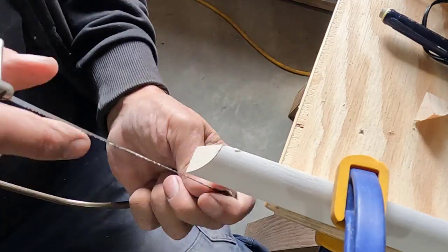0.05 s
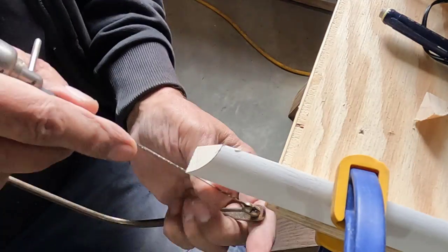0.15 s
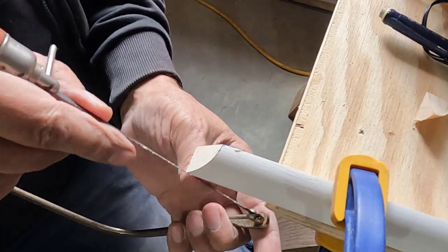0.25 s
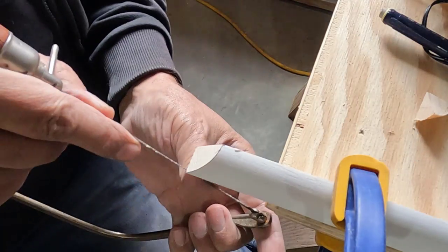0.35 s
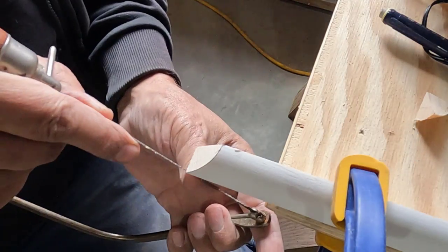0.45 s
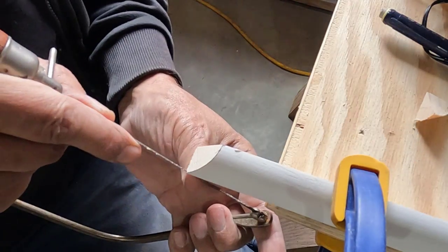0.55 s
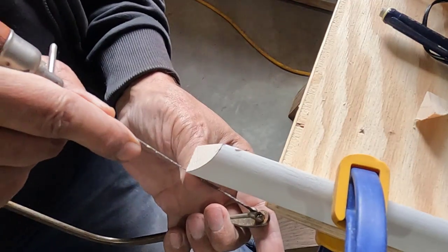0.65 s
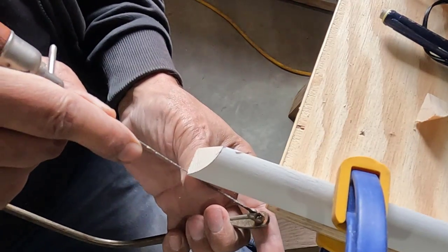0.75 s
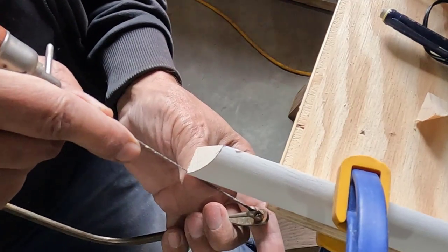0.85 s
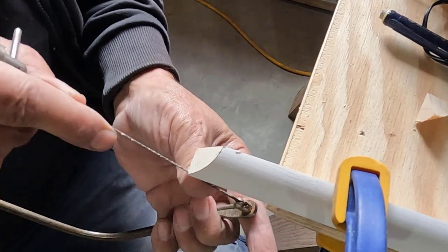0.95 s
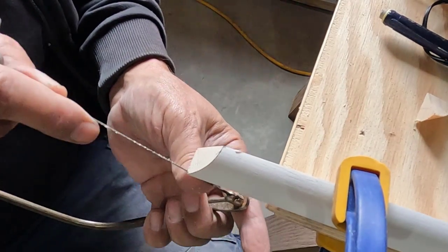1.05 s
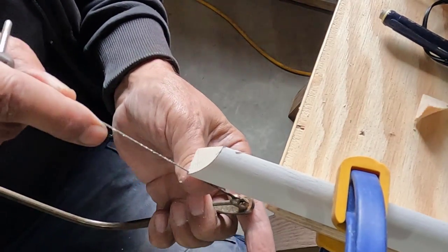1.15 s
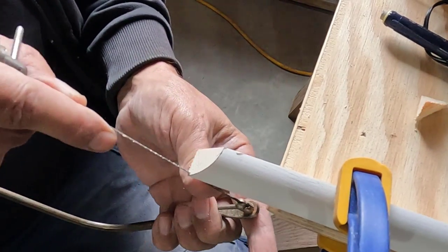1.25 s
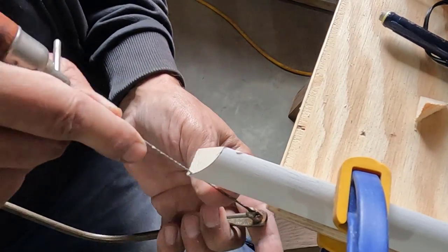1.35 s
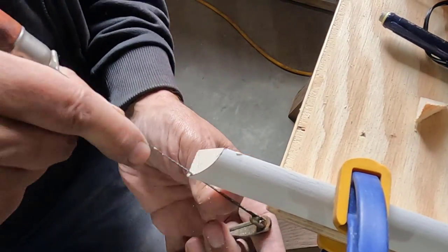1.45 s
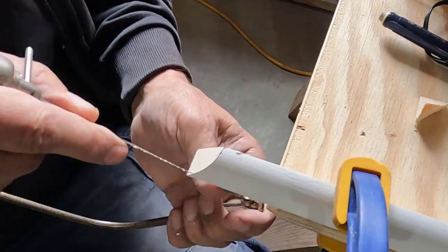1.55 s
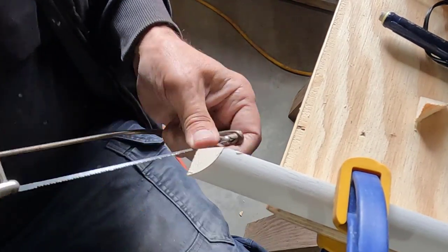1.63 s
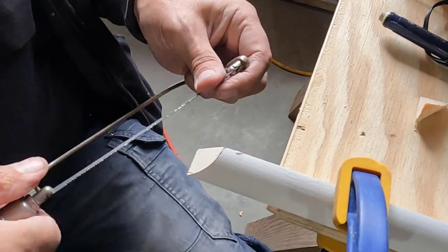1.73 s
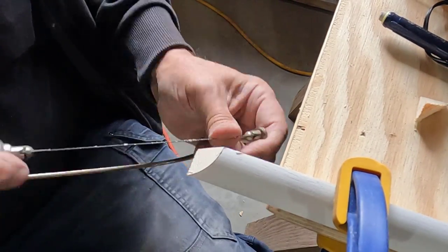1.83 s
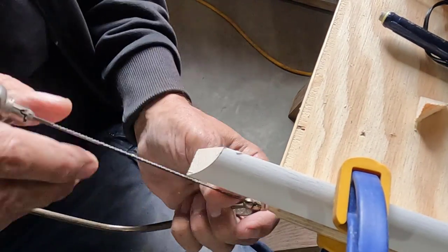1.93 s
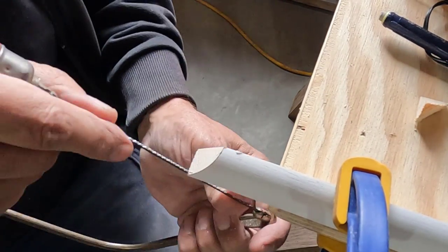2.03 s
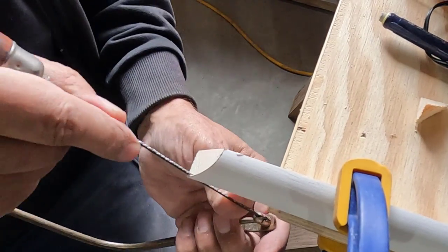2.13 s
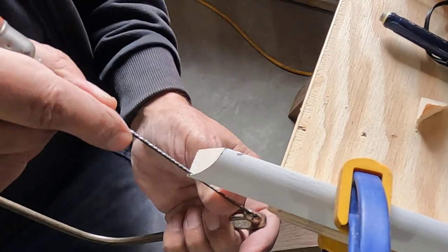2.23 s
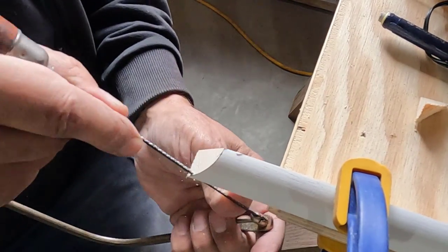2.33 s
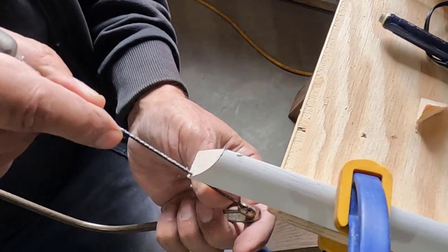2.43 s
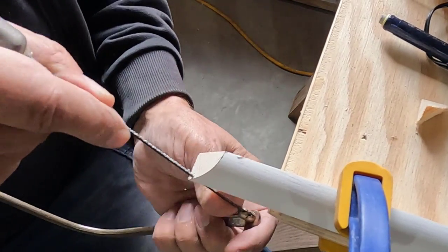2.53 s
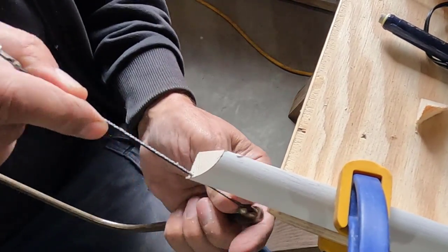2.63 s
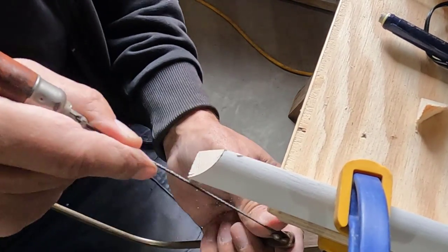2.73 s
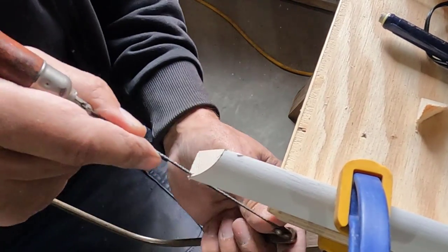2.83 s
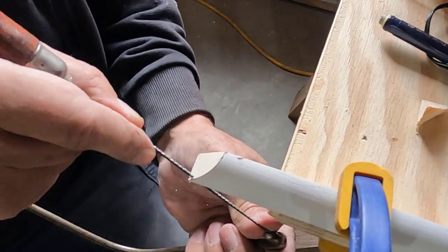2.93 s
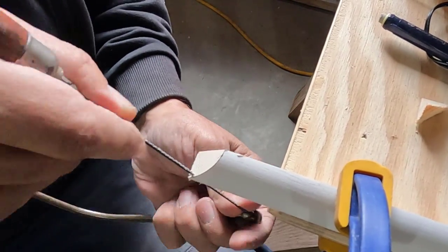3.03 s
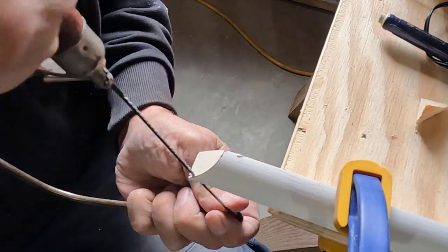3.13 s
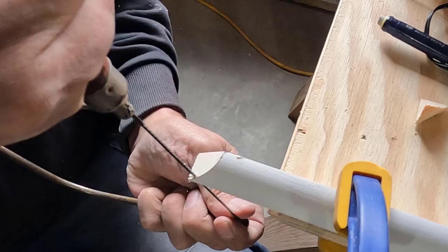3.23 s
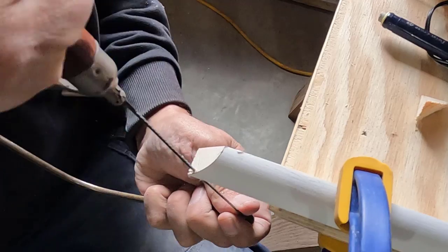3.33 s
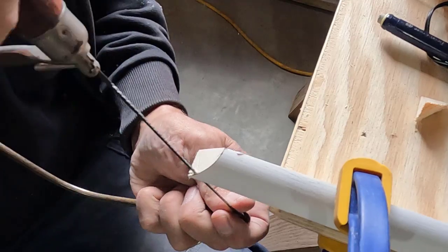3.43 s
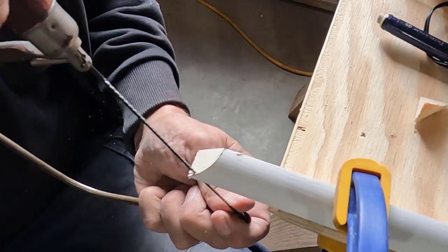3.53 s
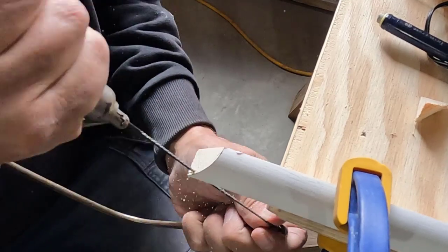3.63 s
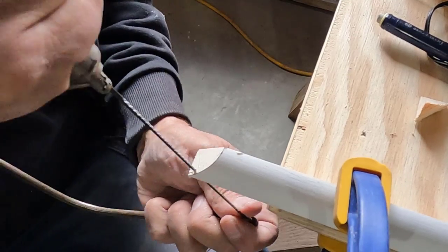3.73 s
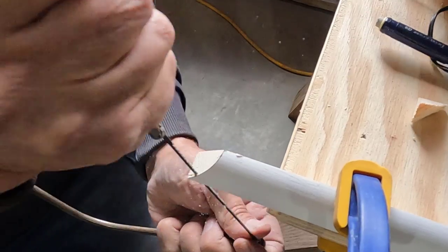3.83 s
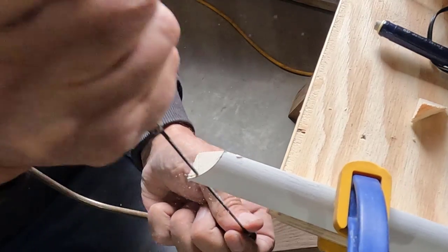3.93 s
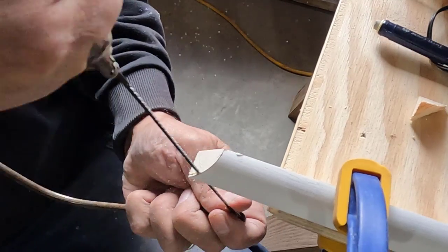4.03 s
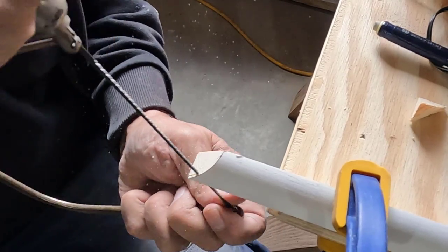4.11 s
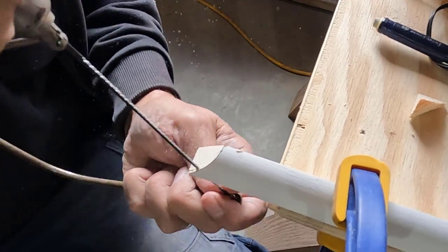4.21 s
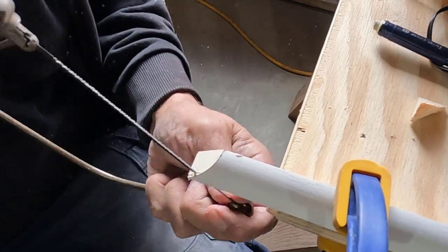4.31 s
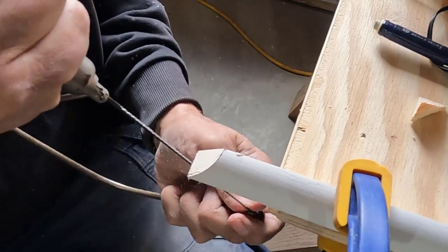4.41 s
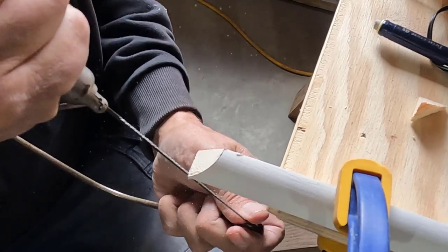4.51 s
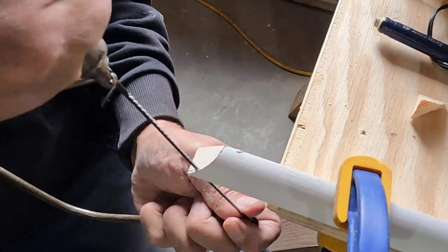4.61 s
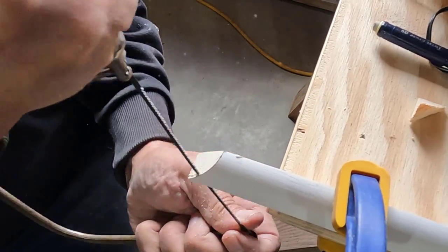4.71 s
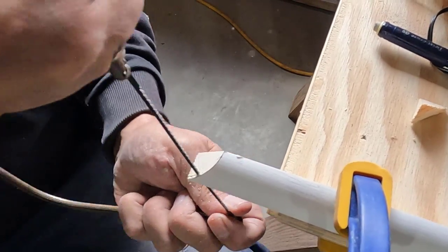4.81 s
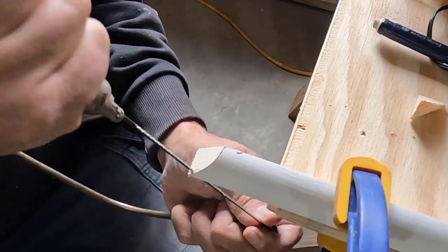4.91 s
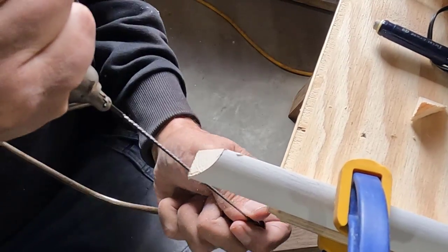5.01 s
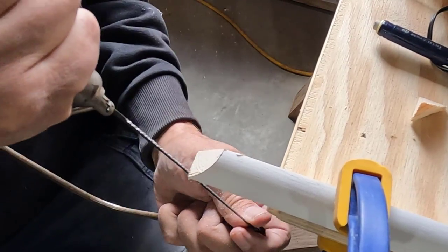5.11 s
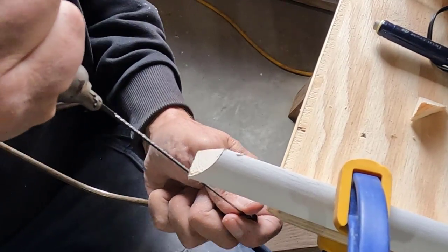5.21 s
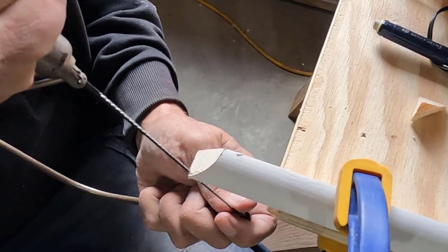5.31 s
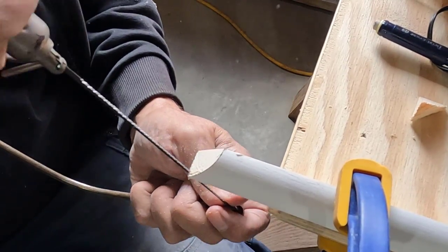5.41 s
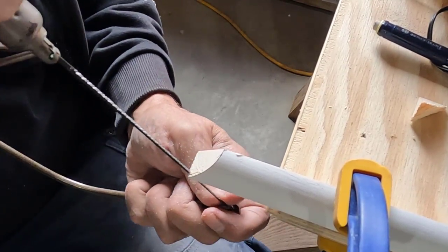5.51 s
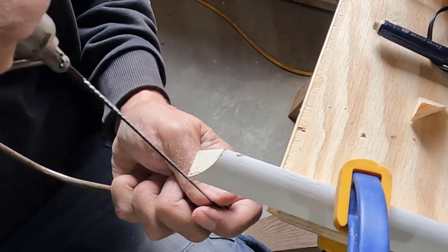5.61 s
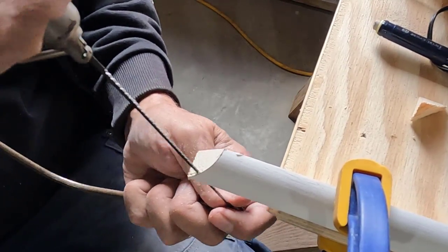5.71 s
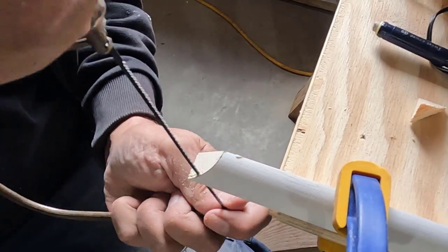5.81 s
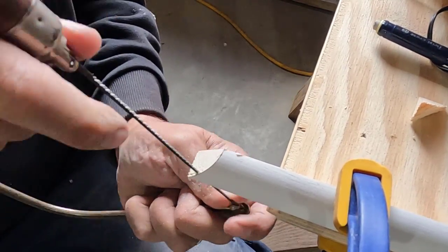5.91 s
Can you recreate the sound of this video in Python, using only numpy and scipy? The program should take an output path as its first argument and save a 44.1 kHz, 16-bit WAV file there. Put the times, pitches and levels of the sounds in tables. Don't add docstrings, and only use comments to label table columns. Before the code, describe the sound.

Soft sleeve and hand movement opens, then jerky saw bites scrape and thud in wood. A lull with faint squeak and brushing follows, then more bites, growing heaviest around the middle and later part with clunky jolts and bright snaps. Light scrapes and rustle end it. Close microphone, small dry workshop, very slight reverberation.

```python
import sys
import numpy as np
from scipy import signal
from scipy.fft import rfft, irfft, next_fast_len
from scipy.io import wavfile
from scipy.ndimage import uniform_filter1d, map_coordinates

SR = 44100
rng = np.random.default_rng(int(sys.argv[2]) if len(sys.argv) > 2 else 0)


def output_pcm(signal):
    pcm = np.clip(np.atleast_2d(signal).T, -1, 1) * 32767
    wavfile.write(sys.argv[1], SR, np.round(pcm).astype(np.int16))


def elevation(decibels):
    levels = np.asarray(decibels, float)
    return 10 ** (levels / 20)


N = 262836
LEAD_S = .07
PUSH = 8192
PUSH_HZ = np.fft.rfftfreq(PUSH, 1 / SR)


def unit(x):
    return x / np.sqrt(np.mean(np.abs(x) ** 2) + 1e-20)


def along(points, hz):
    f, value = np.transpose(points)
    return np.interp(np.log(hz + 1), np.log(f + 1), value)


def wobble(rate):
    knots = rng.standard_normal(int(N * rate / SR) + 4)
    return map_coordinates(knots, [np.arange(N) * rate / SR])


def filtered(x, response):
    m = next_fast_len(x.shape[-1] + SR // 2)
    y = irfft(rfft(x, m) * response(np.fft.rfftfreq(m, 1 / SR)), m)
    return y[..., :x.shape[-1]]


def patchy(spectrum, patchy_db):
    z = signal.stft(rng.standard_normal(N), nperseg=512)[2]
    field = uniform_filter1d(rng.standard_normal(z.shape), 6, 0)
    field = uniform_filter1d(field, 6, 1)
    noise = signal.istft(z * elevation(patchy_db * unit(field)), nperseg=512)[1][:N]
    return unit(filtered(noise, lambda hz: elevation(along(spectrum, hz))))


# pitch_hz, level_db (per Hz)
RUB = [(18, -33), (35, 5.5), (119, -8), (165, -0.5), (284, -5), (362, -2.5), (448, -5), (900, -17),
       (1170, -70), (1980, -120)]
CLOTH = [(350, -5.5), (600, 0.5), (1090, 1.5), (1300, 3), (2190, -2.5), (4000, -9.5), (5500, -20),
         (8800, -49)]
HISS = [(1760, -12.5), (3000, -8.5), (3150, -12.5), (5290, -13), (7500, -21), (9750, -61), (16500, -120)]
FIZZ = [(4000, -20), (6500, -11.5), (8000, -8), (8800, 4), (10000, 3), (11300, 9.5), (12600, -20),
        (13300, -8)]
# time_s, level_db
MOVEMENT = [(0.0, -54.5), (0.16, -61.5), (0.45, -61.5), (1.03, -58.5), (1.18, -58), (1.78, -61.5),
            (2.09, -59), (2.51, -56.5), (2.82, -60.5), (3.3, -58), (3.49, -55.5), (3.9, -54.5),
            (4.23, -51.5), (4.4, -55), (5.16, -57), (5.43, -53.5), (5.66, -60), (5.96, -56.5)]
# start_s, length_s, hiss_level_db
SWISHES = [(-.05, 0.24, -64), (0.683, 0.098, -69), (1.0, 0.11, -71), (1.328, 0.056, -65),
           (1.593, 0.16, -59.5), (1.77, .08, -58.5), (1.903, 0.17, -65.5), (2.3, 0.36, -70),
           (2.824, 0.14, -65), (3.126, .1, -59), (3.396, .06, -77), (3.644, 0.073, -64), (4.077, 0.06, -76),
           (4.347, 0.065, -62), (4.598, .08, -66), (4.747, 0.066, -58), (5.17, 0.14, -63),
           (5.582, .13, -65), (5.918, 0.12, -58)]


def rustle():
    calm_db, edge_s, fade_s = -58, 0.018, 0.064
    t = np.arange(N) / SR
    cloth_db = np.interp(t, *np.transpose(MOVEMENT))
    busy_db = cloth_db - calm_db
    swish = np.zeros(N)
    for s, length, db in SWISHES:
        opening = np.minimum((t - s) / edge_s, (s + length - t) / fade_s)
        swish += elevation(db) * np.clip(opening + .5, 0, 1) ** 2
    shared, treble = wobble(21.3), wobble(21.92)
    rub_gain = elevation(calm_db + 5 + busy_db + 0.41 * shared)
    cloth_gain = np.hypot(elevation(cloth_db), elevation(-1) * swish) * elevation(1.1 * shared)
    hiss_gain = np.hypot(elevation(calm_db - 13 + 0.21 * busy_db), swish) * elevation(.9 * shared + .8 * treble)
    fizz_gain = np.hypot(elevation(calm_db - 30 + 0.32 * busy_db), elevation(-8.5) * swish)
    fizz_gain = fizz_gain * elevation(.9 * shared + 2.5 * treble)
    low = rub_gain * patchy(RUB, patchy_db=-2.5) + cloth_gain * patchy(CLOTH, patchy_db=.6)
    high = hiss_gain * patchy(HISS, patchy_db=.7) + fizz_gain * patchy(FIZZ, patchy_db=.8)
    return low + high


# pitch_hz, level_db (per Hz)
HUSH = [(5000, -30), (7500, -3), (9000, 0), (12400, -2), (13000, -30)]


def hush():
    return elevation(-89) * patchy(HUSH, patchy_db=0)


def ringing(modes, hz, scatter_db):
    luck = elevation(scatter_db * rng.standard_normal(len(modes)))
    answer = 0
    for k, (centre, width, db) in enumerate(modes):
        resonance = 1j * hz * width / (centre * centre - hz * hz + 1j * hz * width)
        answer = answer + (-1) ** k * luck[k] * elevation(db) * resonance
    return unit(answer)


def diffuse(modes, hz, scatter_db):
    luck = elevation(scatter_db * rng.standard_normal(len(modes)))
    power = 0
    for k, (centre, width, db) in enumerate(modes):
        detuning = (centre * centre - hz * hz) ** 2 + (hz * width) ** 2
        power = power + (luck[k] * elevation(db) * hz * width) ** 2 / detuning
    cepstrum = irfft(np.log(power + 1e-9) / 2)
    cepstrum[1:len(hz) - 1] *= 2
    cepstrum[len(hz):] = 0
    return unit(np.exp(rfft(cepstrum)))


def teeth(rate, uneven_db, tearing):
    catches = (rng.random(PUSH) < rate / SR) * elevation(uneven_db * rng.standard_normal(PUSH))
    catches = unit(catches - catches.mean())
    share = np.clip(tearing, 0, 1)
    return np.sqrt(1 - share) * catches + np.sqrt(share) * rng.standard_normal(PUSH)


# pitch_hz, width_hz, level_db
MOULDING = [(920, 50, -9), (1050, 90, 0), (1180, 100, -3), (1330, 120, -9), (1510, 100, 0), (1690, 90, -1),
            (1885, 90, -1), (2085, 90, -2), (2250, 110, -6)]
TIP = [(2580, 230, 11.5), (2990, 82, 10), (3190, 250, -1.5), (3230, 326, 4.5), (4020, 550, -2)]
BLADE = [(4300, 113, 6), (4650, 103, 6), (5290, 68, -0.5), (5970, 340, -8), (6950, 340, -1),
         (8070, 120, -5.5), (10400, 8500, -30), (11360, 410, -10.5)]
BOARD = [(285, 50, -4), (338, 50, 1), (410, 60, -5), (478, 45, -1), (610, 45, -5), (740, 110, -13)]
BENCH = [(86, 150, -6), (162.9, 49.6, 7), (219, 290, -19.5)]


def burst(rise, fall, grain, *bodies):
    sound = 0
    for modes, db, scatter_db, focus in bodies:
        steel = modes is BLADE
        t = np.arange(PUSH) / SR - LEAD_S + steel * min(.0005, rise / 2)
        span = np.where(t < 0, rise, fall * .75 ** steel)
        reach = np.abs(t) / np.maximum(span, .002)
        pressure = elevation(focus * -10 * reach ** np.where(t < 0, 2.7, 1.4))
        work = np.sqrt(np.mean(pressure ** 2))
        answer_of = diffuse if steel or modes is TIP else ringing
        answer = answer_of(modes, PUSH_HZ, scatter_db)
        sound = sound + elevation(db) * work * unit(irfft(rfft(pressure * grain) * answer, PUSH))
    return sound


def fine_teeth(tearing=.42):
    return teeth(600, 3, tearing)


def add(out, s, sound):
    start = round((s - LEAD_S) * SR)
    out[start:start + len(sound)] += sound


# strongest_s, moulding_db, thud_above_it_db, rise_s, fall_s
BITES = [(0.768, -47, -6, 0.0098, 0.0065), (0.966, -33, 0.5, 0.0079, 0.042),
         (0.991, -29.5, -1.5, 0.0035, 0.0056), (1.068, -38.5, -4, 0.0081, 0.024),
         (1.144, -46.5, -0.5, 0.017, 0.026), (1.284, -32.5, 2.5, 0.025, 0.013),
         (1.395, -23, 0.5, 0.018, 0.02), (1.445, -43.5, -4, 0.031, 0.0065),
         (2.281, -37, -1.5, 0.02, .016), (2.335, -34, -0.5, 0.0029, 0.04),
         (2.391, -32, -4, 0.017, 0.013), (2.416, -34.5, -1.5, .015, 0.026),
         (2.486, -43, -1, 0.022, 0.017), (2.536, -48, -3.5, .022, 0.005),
         (2.66, -48.5, -7, 0.02, 0.028), (2.722, -39.5, -3, 0.012, 0.0064),
         (2.738, -27, 1.5, 0.0073, 0.032), (2.992, -47, 2, 0.02, 0.084),
         (3.059, -45, 3.5, 0.012, 0.026), (3.253, -25.5, 6.5, 0.02, 0.023),
         (3.301, -31, -7, 0.024, 0.015), (1.533, -46, -5.5, 0.0094, 0.013),
         (0.11, -56.5, 7.5, 0.033, 0.049),
         (3.46, -41.5, 2, 0.023, 0.013), (3.7, -28, 7, 0.022, 0.024), (3.767, -33, -6.5, 0.02, 0.016),
              (3.839, -30.5, 7, 0.0071, 0.0087), (3.862, -24, -1, 0.022, 0.045),
              (3.919, -27.5, 8.5, 0.019, 0.04), (3.956, -29.5, -7, 0.026, 0.0093),
              (4.031, -29, 6.5, 0.027, 0.039), (4.074, -32, -5, 0.052, 0.0062),
              (4.182, -29.5, -1.5, 0.017, 0.018), (4.3, -36, -3, 0.021, 0.015),
              (4.436, -24.5, -2.5, 0.013, 0.014), (4.451, -57, -24, .03, 0.016),
              (4.67, -49, 2, 0.031, 0.02), (4.715, -35.5, 1.5, 0.021, 0.019),
              (4.853, -36, 8.5, 0.019, 0.024), (5.017, -30, -1.5, 0.017, 0.024),
              (5.042, -32, -1, 0.03, 0.017), (5.247, -45.5, 0, 0.0097, 0.012),
              (5.315, -42, 1, 0.0055, 0.024), (5.503, -45, -2.5, 0.04, 0.023),
              (5.556, -43, -4.5, 0.021, 0.0094), (5.811, -50.5, 0, 0.014, 0.013)]
# strongest_s, moulding_db, thud_above_it_db, rise_s, fall_s
BLUNT = [(0.822, -45.5, -5, 0.031, 0.013), (1.3, -45.5, 1, 0.016, 0.02), (2.09, -52, -4.5, 0.015, 0.0056),
         (3.373, -62, 14, 0.0091, 0.012), (3.524, -36.5, 5.5, 0.011, 0.027), (4.1, -41, -11, 0.013, 0.015),
         (3.5, -42, 3, 0.0082, 0.011), (6.1, -63.5, 20, 0.012, 0.017), (3.5, -52, -3, 0.07, 0.013),
         (5.377, -44, -18, 0.029, 0.018), (2.739, -35.5, 14, 0.0015, 0.0055),
         (4.2, -45, 12.5, 0.036, 0.0032), (4.419, -43, -14, 0.012, 0.0069),
         (0.07, -67.5, 17.5, 0.17, 0.037), (5.9, -50.5, 4.5, 0.004, 0.0039)]
# strongest_s, moulding_db, brightness_db, half_length_s
BRUSHES = [(0.07, -61.5, 18, 0.056), (1.61, -48.5, -6, 0.019), (1.67, -56.5, 0, 0.061),
           (1.793, -56.5, 5, 0.047), (2.185, -58.5, 2, 0.045), (2.588, -58.5, 11, 0.024),
           (2.624, -53, -5, 0.0085), (2.858, -60, 0, 0.018), (2.884, -77, 14, .015),
           (2.927, -57.5, 6, 0.0088), (3.139, -58.5, 13, 0.011), (3.153, -57, 2, 0.014),
           (3.21, -75, 20, .02), (3.648, -51, -11, 0.0085), (3.984, -42, -13, 0.012),
           (4.344, -50.5, -1, 0.014), (4.371, -52.5, 0, 0.016), (4.563, -50, -1, 0.017),
           (4.791, -59, 4, 0.025), (4.929, -63, 13, 0.013), (5.108, -52, -16, 0.0082),
           (5.183, -58, -3, 0.022), (5.652, -61.5, 0, 0.038), (5.901, -58.5, 1, 0.065),
           (4.443, -47, -9, 0.033), (3.593, -40, -19, 0.015), (5.628, -64, 6, 0.025),
           (5.364, -59, 3, 0.005)]
# from_s, bench_db
GRIP = [
    (0, -18),
    (.7, 3),
    (2.2, 3),
    (3.2, 2.5),
    (3.8, -1.5),
    (4.4, -3),
    (4.8, 4),
]


def strokes():
    rows = [(*row, 0, 0) for row in BITES]
    rows += [(*row, 0, -43) for row in BLUNT]
    rows += [(s, db, -2, half, half, 0.73 * bright, bright) for s, db, bright, half in BRUSHES]
    out = np.zeros(N + SR)
    for s, db, thud_db, rise, fall, tip_db, blade_db in rows:
        grip_db = [g for start, g in GRIP if start <= s][-1]
        force_db = max(db, -50) + 33.5
        tip_level = db - 11 + tip_db - 0.096 * force_db
        blade_level = db - 15.5 + blade_db - 0.01 * force_db
        add(out, s, burst(rise, fall, fine_teeth(), (MOULDING, db, 1.2, 1.1),
                          (TIP, tip_level, 2.2, .65), (BLADE, blade_level, 2.2, 1.4)))
        board_level = db + thud_db
        thud_grain = teeth(400, 2.9, 0.67)
        add(out, s, burst(1.043 * rise, 0.55 * fall, thud_grain, (BOARD, board_level, 1.2, 1.1),
                          (BENCH, board_level - 2 + grip_db, 2.2, .9)))
    return out[:N]


# strongest_s, level_db, half_length_s, pitch_hz, width_hz
SIGHS = [(.03, -64, .03, 6300, 1200), (.065, -64, .02, 5800, 1500), (.25, -66, .03, 3300, 1200),
         (.82, -54, .025, 2200, 1500), (1.21, -47, .03, 330, 90), (1.215, -48, .015, 2600, 1800),
         (1.61, -65, .02, 4700, 250), (1.67, -64, .04, 4150, 300), (1.79, -63, .02, 3100, 300),
         (2.07, -59, .04, 450, 400), (3.03, -55, .04, 2500, 1500), (3.6, -46, .025, 2800, 800),
         (3.65, -58, .015, 4200, 400), (4.395, -60, .012, 4600, 300), (4.418, -46, .014, 3600, 500),
         (4.455, -46, .02, 3400, 700), (4.555, -57, .02, 2200, 1200), (4.785, -58, .02, 4500, 600),
         (4.88, -50, .015, 3000, 1500), (5.065, -48, .015, 3000, 1500), (5.2, -67, .05, 4400, 700),
         (5.47, -66, .035, 4600, 600), (5.65, -65, .07, 4500, 800), (5.93, -67, .03, 4500, 500),
         (5.945, -63, .02, 3400, 400)]


def sighs():
    out = np.zeros(N + SR)
    for s, db, half, centre_hz, width_hz in SIGHS:
        band = [(centre_hz, width_hz, 0)]
        sound = burst(half, half, fine_teeth(tearing=1), (band, db, 0, 1))
        sound = irfft(rfft(sound) / (1 + ((PUSH_HZ - centre_hz) / width_hz) ** 2))
        start = round((s - LEAD_S) * SR)
        out[max(0, start):][:len(sound)] += np.roll(sound, min(0, start))
    return out[:N]


# time_s, peak_db
SNAGS = [(0.7597, -36), (0.9617, -53), (0.991, -25.5), (1.0665, -34), (1.2792, -33), (1.3816, -22.5),
         (2.2745, -32), (2.3331, -54), (2.7063, -42), (2.735, -45), (3.1345, -39), (3.24, -38),
         (3.5184, -62), (3.6772, -30.5), (3.699, -21), (3.7583, -31), (3.84, -33), (4.0173, -44),
         (4.1794, -26.5), (4.4346, -21), (4.7002, -54), (4.711, -33.5), (4.8389, -35), (5.013, -23.5)]


def snags():
    out, length_s = np.zeros(N + SR), 0.00053
    for s, db in SNAGS:
        add(out, s, burst(length_s, length_s, teeth(3300, 1.9, 1.0),
                          (BLADE, db - 11, 2.2, 1), (TIP, db - 16, 2.2, 1)))
    return out[:N]


# time_s, board_peak_db, moulding_db
JOLTS = [(0.76, -44, -48), (0.806, -33, -38), (0.962, -20.5, -22), (0.971, -23, -36), (0.979, -28, -39),
         (0.991, -23, -40), (1.065, -29, -36), (1.222, -21, -29), (1.275, -20, -29), (1.386, -8.5, -29),
         (1.392, -13, -27), (1.402, -17, -23), (2.274, -30, -30), (2.335, -27, -32), (2.375, -22, -29),
         (2.423, -28, -37), (2.735, -11, -11), (2.743, -15.5, -29), (3.057, -30, -43), (3.237, -17, -19),
         (3.244, -6.5, -16), (3.253, -8, -23), (3.261, -15, -22), (3.296, -25, -31), (3.511, -20.5, -21),
         (3.691, -13, -34), (3.691, -12.5, -29), (3.753, -28, -36), (3.841, -15.5, -18), (3.86, -16, -25),
         (3.916, -22, -27), (3.917, -9, -27), (3.927, -11, -25), (3.934, -8.5, -25), (4.011, -24, -29),
         (4.018, -8.5, -18), (4.029, -14.5, -21), (4.045, -17, -17), (4.174, -14, -21), (4.189, -18, -35),
         (4.286, -23, -32), (4.435, -18.5, -25), (4.436, -17.5, -11), (4.448, -40, -30), (4.71, -22.5, -25),
         (4.84, -13.5, -29), (4.857, -13, -29), (5.008, -26, -20), (5.035, -22, -23), (5.245, -32, -41),
         (5.312, -26, -21.5), (5.376, -39, -21.5)]


def jolts():
    out = np.zeros(N + SR)
    softness = (1 + 1j * PUSH_HZ / 2000) ** 4
    for s, db, ring_db in JOLTS:
        for modes, level_db in [(BOARD, db), (BENCH, db - 7.5), (MOULDING, ring_db + 2)]:
            blow = irfft(ringing(modes, PUSH_HZ, scatter_db=3) / softness)
            add(out, s + LEAD_S, elevation(level_db - 9.5) * blow / np.abs(blow).max())
    return out[:N]


# time_s, level_db, half_length_s
KNOCKS = [
    (1.072, -42.5, 0.025),
    (1.227, -27.5, 0.012),
    (1.538, -37, 0.0047),
    (2.479, -38.5, 0.013),
    (4.189, -26, 0.0098),
    (4.555, -54, 0.017),
]


def knocks():
    out = np.zeros(N + SR)
    for s, db, half in KNOCKS:
        add(out, s, burst(half, half, teeth(560, 1.5, 0.76), (BENCH, db, 2.2, .9)))
    return out[:N]


# time_s, level_db, half_length_s
CHATTER = [
    (4.1, -50, .032),
    (1.66, -56.5, 0.065),
    (3.2, -57, 0.014),
]


def chatter():
    out = np.zeros(N + SR)
    for s, db, half in CHATTER:
        add(out, s, burst(half, half, fine_teeth(), (TIP, db, 2.2, 1)))
    return out[:N]


# start_s, length_s, from_pitch_hz, to_pitch_hz, level_db
SQUEAKS = [
    (5.85, .08, 4550, 5150, -66),
    (5.885, .04, 5100, 5300, -62),
    (5.44, .035, 6850, 6900, -73),
    (5.44, .045, 5300, 5350, -68),
    (1.6, .13, 2050, 2350, -60),
    (1.64, .06, 4150, 4250, -62),
    (3.58, .05, 2800, 2950, -56),
]


def squeaks():
    out, t = np.zeros(N), np.arange(N) / SR
    hoarse, drift = 1.1 + .6 * wobble(160), 1 + .008 * wobble(150)
    for s, length, from_hz, to_hz, db in SQUEAKS:
        u = np.clip((t - s) / length, 0, 1)
        pitch = (from_hz + (to_hz - from_hz) * u) * drift
        out += elevation(db) * np.sin(np.pi * u) * np.sin(2 * np.pi * np.cumsum(pitch) / SR)
    return out * hoarse


# pitch_hz, time_to_fall_60_db_s
SHOP = [(150, 0.089), (1500, 0.28), (8000, 0.12)]


def shop(x):
    hz, t, z = signal.stft(rng.standard_normal(SR // 3), SR, nperseg=256)
    fading = elevation(-60 * t / along(SHOP, hz)[:, None])
    tail = signal.istft(z * fading, SR, nperseg=256)[1]
    late = np.pad(x, (300, 0))
    return signal.fftconvolve(late, tail / np.linalg.norm(tail))[:N]


# pitch_hz, level_db
MICROPHONE = [(20, -26), (60, -8), (120, 1.5), (8000, 0), (8350, -1), (8750, -13), (8960, -13), (9050, -36),
              (9150, -34), (9260, -8), (12600, -4), (13000, -24), (14300, -50)]


def scene():
    cut = strokes() + snags() + knocks() + chatter()
    air = rustle() + hush() + cut + elevation(-23.5) * shop(cut) + sighs() + jolts() + squeaks()
    heard = filtered(air, lambda hz: elevation(along(MICROPHONE, hz)))
    return np.array([heard, heard])


def roll_off(x):
    return signal.sosfilt(signal.butter(12, 14140, fs=SR, output="sos"), x)


# pitch_hz, side_under_middle_db
UNLIKE = [(400, -70), (800, -47), (2500, -33.5), (6000, -15.5), (10500, -11), (12000, -6), (13500, 2)]


def record(dry):
    frame, first = 1024, 103
    mid = dry[0]
    treble = filtered(mid, lambda hz: hz > 3000)
    loud = np.sqrt(np.abs(uniform_filter1d(treble ** 2, frame)))[first::frame]
    ticks = np.zeros(N)
    uneven = elevation(2.5 * rng.standard_normal(len(loud)))
    ticks[first::frame] = elevation(-36) * uneven * loud ** 0.5
    tick = filtered(ticks, lambda hz: 10 * np.exp(-((hz - 11350) / np.where(hz < 11350, 600, 1000)) ** 2))
    middle = mid + tick
    hz, _, z = signal.stft(middle, SR, nperseg=frame)
    patches = uniform_filter1d(rng.standard_normal(z.shape), size=40, axis=0)
    patches = uniform_filter1d(patches, size=3, axis=1)
    kept = (unit(patches) > .45) | (hz[:, None] > 11000)
    random_phase = np.exp(2j * np.pi * rng.random(z.shape))
    z = z * kept * elevation(along(UNLIKE, hz))[:, None] * random_phase
    side = signal.istft(z, SR, nperseg=frame)[1][:N]
    return roll_off(np.array([middle + side, middle - side]))


dry = scene()
out = record(dry)
output_pcm(out)
```